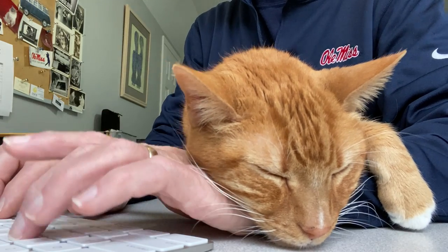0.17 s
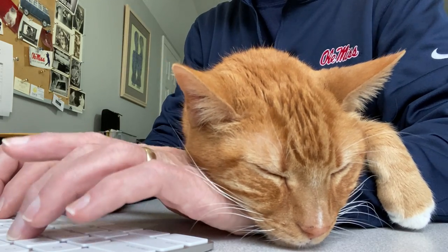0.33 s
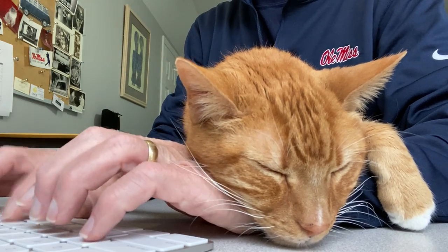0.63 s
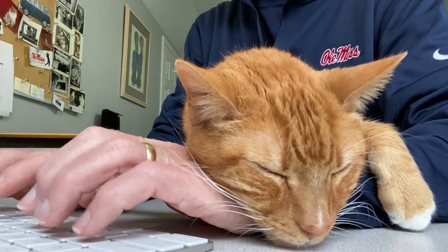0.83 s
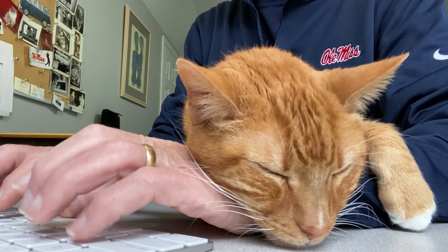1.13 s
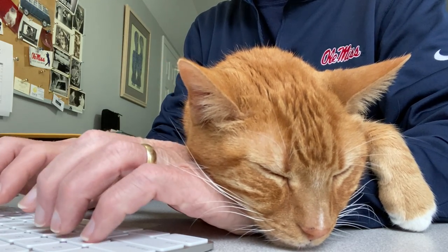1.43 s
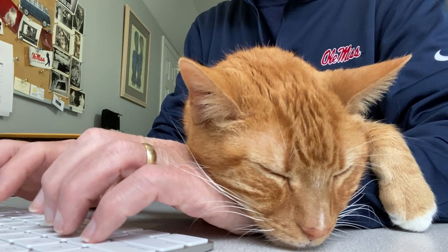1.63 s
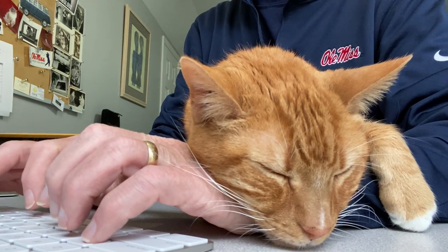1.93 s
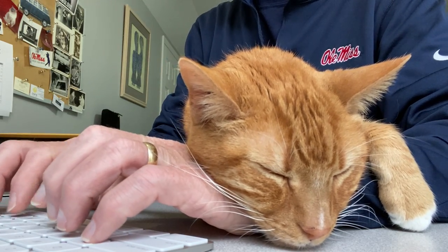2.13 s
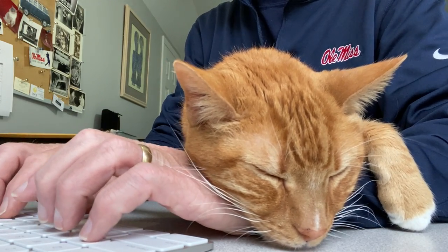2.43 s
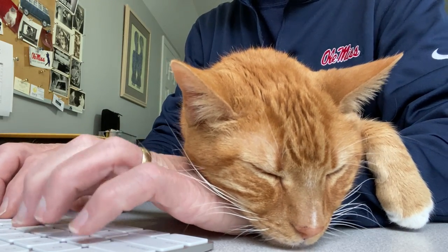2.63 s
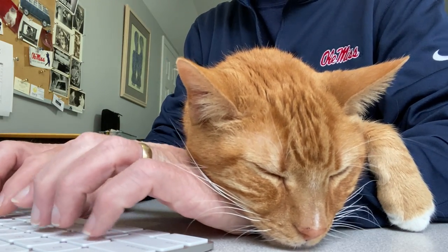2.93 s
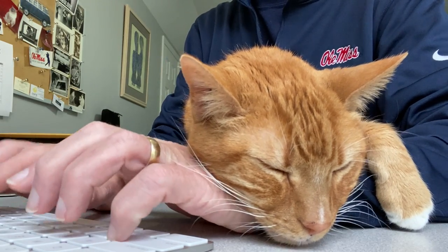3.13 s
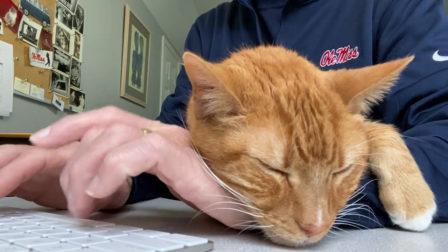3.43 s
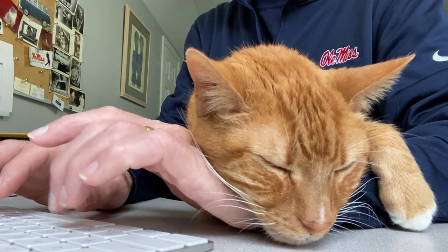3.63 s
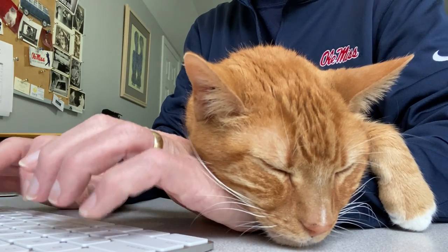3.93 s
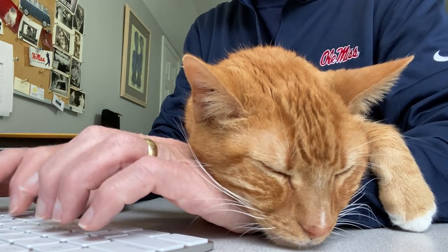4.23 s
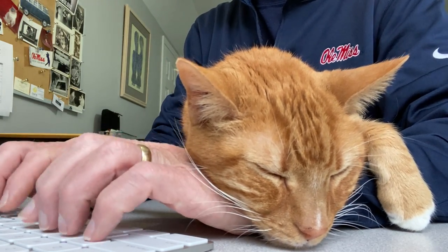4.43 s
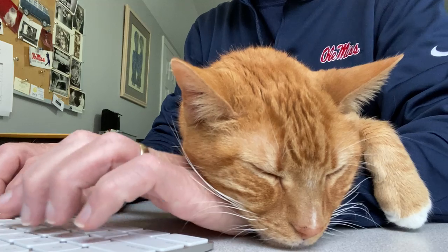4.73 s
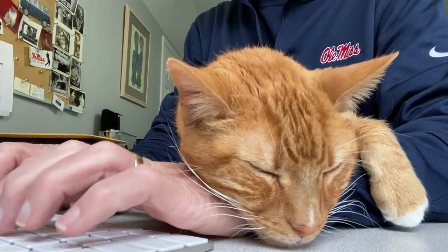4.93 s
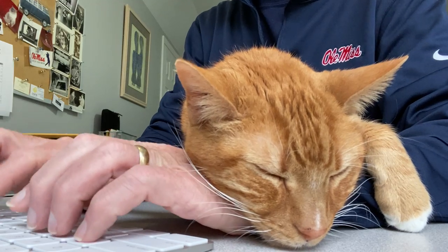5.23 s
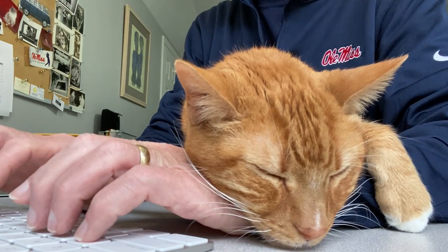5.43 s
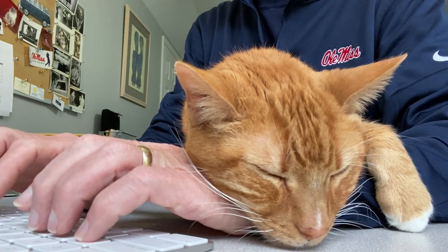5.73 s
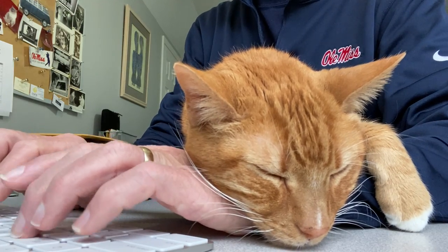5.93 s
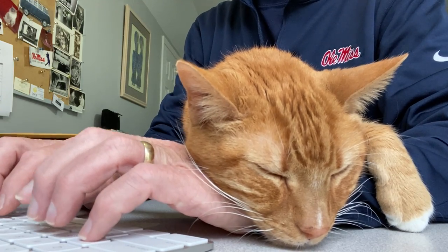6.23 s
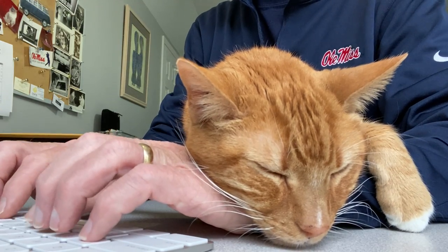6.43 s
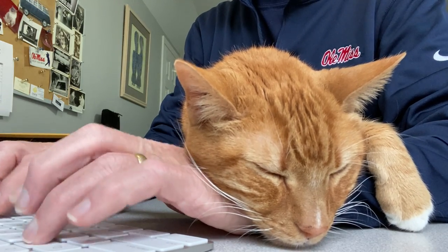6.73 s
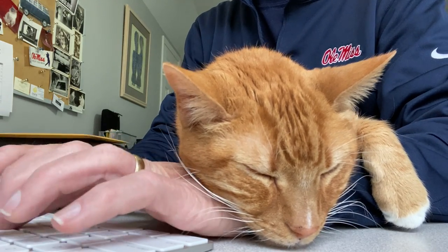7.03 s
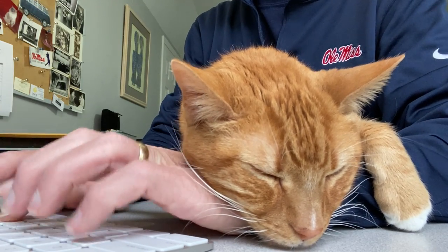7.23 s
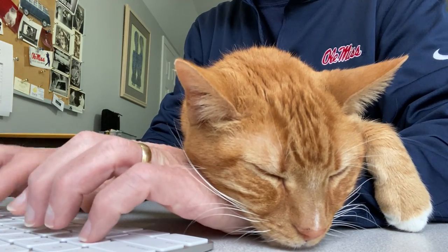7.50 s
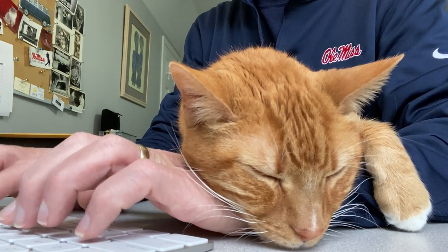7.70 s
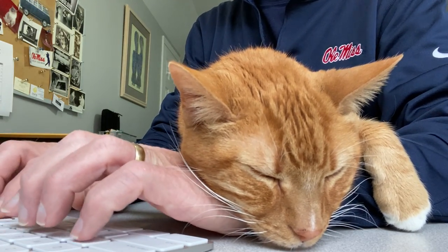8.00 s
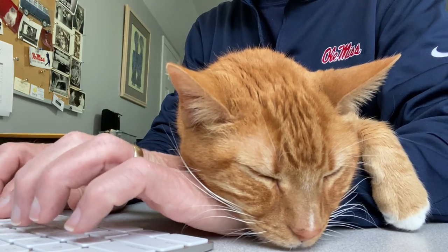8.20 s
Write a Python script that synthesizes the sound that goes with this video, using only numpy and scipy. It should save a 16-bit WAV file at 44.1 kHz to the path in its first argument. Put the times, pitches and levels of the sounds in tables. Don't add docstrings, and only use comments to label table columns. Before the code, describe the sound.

A cat purrs close by in a quiet office, rattling and breathy, while fingers type in irregular bursts on a flat keyboard with soft desk thumps.

```python
import sys
import numpy as np
from scipy import signal
from scipy.fft import next_fast_len
from scipy.io import wavfile
from scipy.ndimage import uniform_filter1d

SR = 44100
rng = np.random.default_rng(int(sys.argv[2]) if len(sys.argv) > 2 else 0)


def store_wav(level_fs):
    pcm = np.round(np.clip(np.atleast_2d(level_fs), -1, 1) * 32767)
    wavfile.write(sys.argv[1], SR, pcm.T.astype(np.int16))


def gain_from_db(level_db):
    decades = np.asarray(level_db, float) / 20
    return 10 ** decades


N = 368676
TIME = np.arange(N) / SR


def level(x, db):
    return x * gain_from_db(db) / np.sqrt(np.mean(x ** 2))


def band(x, hz, width):
    section = np.hstack(signal.iirpeak(hz, hz / (1.793 * width), SR))
    return signal.sosfilt([section, section], x)


def body(x, modes):
    share = np.sqrt(sum(gain_from_db(db) ** 2 * width for _, width, db in modes) * 2.67 / SR)
    ringing = sum((-1) ** k * gain_from_db(db) * band(x, hz, width) for k, (hz, width, db) in enumerate(modes))
    return ringing / share


def walk(rate):
    hold = int(SR / rate)
    steps = np.repeat(rng.standard_normal(N // hold + 1), hold)
    return 3.2 * uniform_filter1d(uniform_filter1d(steps, hold), hold)[:N]


def pair(alike):
    same, left, right = rng.standard_normal((3, N))
    alike = np.clip(alike, 0, 1)
    return np.sqrt(alike) * same + np.sqrt(1 - alike) * np.array([left, right])


def impulses(s, sizes):
    train = np.zeros(N)
    np.add.at(train, np.clip((s * SR).astype(int), 0, N - 1), sizes)
    return train


def clicks(s, db):
    return impulses(s, gain_from_db(db))


def strikes(s, db, fades, lead=None, hold=0):
    t = TIME[:SR // 2]
    fading = np.clip(t - hold, 0, None)
    shape = sum(gain_from_db(fade_db) ** 2 * np.exp(-2 * np.log(1000) * fading / t60) for fade_db, t60 in fades)
    early = gain_from_db(lead[0]) ** 2 * np.exp(-t[1000:0:-1] / lead[1] * 2) if lead else t[:0]
    power = signal.oaconvolve(impulses(s, gain_from_db(db) ** 2), np.r_[early, shape])
    return np.sqrt(np.abs(power[len(early):][:N]))


def place(x, pan_db, lag):
    return np.array([np.roll(x[0], int(lag)) * gain_from_db(pan_db / 2), x[1] * gain_from_db(-pan_db / 2)])


# pitch_hz, level_db, wobble_db
HUM_LINES = [(59, -60.5, 1.5), (98.95, -54, 0.9)]
# pitch_hz, width_hz, level_db
FAN_WHINE = (1080, 80, -79)
# pitch_hz, width_hz, level_db
BUILDING = [(57.7, 9, 0.5), (113.7, 15, -4.5), (29, 5, -8), (150, 22, -16.5)]
# pitch_hz, level_db (per Hz)
ROOM_AIR = [(140, -2), (404, -15), (539, -24), (1080, -10), (1390, -23.5), (10100, -30), (11500, -28),
            (14000, -36)]


def office():
    air_hz, air_db = np.transpose(ROOM_AIR)
    air = 0
    for centre in 150 * 2 ** np.arange(0, 6.6, .5):
        band_db = np.interp(np.log(centre), np.log(air_hz), air_db) + 1.3 * walk(9)
        air = air + gain_from_db(band_db) * band(pair(0.026), centre, centre / 4)
    hum = 0
    for hz, db, wobble_db in HUM_LINES:
        loudness = gain_from_db(db + 5.0 + wobble_db * walk(2.153))
        hum = hum + loudness * np.sin(2 * np.pi * hz * TIME + 0.23 * walk(2.525))
    rumble = level(body(pair(0.75), BUILDING) * gain_from_db(1.2 * walk(5)), -59)
    hz, width, db = FAN_WHINE
    whine = level(band(pair(0.069), hz, width) * gain_from_db(walk(5)), db)
    return level(air, -70) + whine + (hum + rumble) * gain_from_db(np.array([[1.5], [-1.5]]))


CUFFS = (5.05, 8.1)


def sleeve():
    cloth = pair(0.22)

    def swell(middle_s, length_s):
        return np.exp(-((TIME - middle_s) / length_s) ** 2)

    wide = body(cloth, [(1770, 2100, 0)]) * gain_from_db(-66.0) * swell(CUFFS[0], 0.095)
    dull = body(cloth, [(590, 140, 0)]) * gain_from_db(-68.5) * swell(CUFFS[1], 0.037)
    return wide + dull


def desk(s, db, hz, push, t60, pan_db):
    scatter, skew_rad = 0.015, 0.42
    out = np.zeros((2, N + SR))
    t = TIME[:SR // 2]
    swing = np.sin(np.pi * np.clip(t / push, 0, 1)) ** 2
    swing = swing + 0.79 * (1 - np.exp(-3 * t / push)) * gain_from_db(-60 * t / t60)
    ports = np.array([[1], [-1]])
    for s, db, hz, chance in zip(s, db, hz, rng.standard_normal((len(s), 3))):
        at = int((s - 0.11 * push) * SR)
        wave = np.sin(2 * np.pi * hz * (1 + scatter * chance[2]) * t + skew_rad * chance[0] * ports)
        lean_db = pan_db + 2.7 * chance[1]
        out[:, at:at + len(t)] += gain_from_db(db + lean_db / 2 * ports) * swing * wave
    return out[:, :N]


# start_s, level_db, pitch_hz
DESK_THUMPS = [(0.17, -37.5, 64.4), (0.322, -46, 90), (0.482, -39, 64.8), (0.672, -34, 69.2),
               (1.097, -34, 68.3), (1.358, -38, 80.4), (1.463, -41.5, 70.6), (1.564, -35, 70.8),
               (1.644, -43.5, 60.6), (1.773, -28, 71.5), (2.621, -35, 68.8), (3.205, -32.5, 67.3),
               (3.345, -48, 83), (3.494, -40, 66), (3.765, -38, 83.3), (4.027, -28, 68.6),
               (4.261, -35, 70.8), (4.86, -47, 72.7), (5.102, -39, 68), (5.303, -42, 70.2),
               (5.442, -44, 72.2), (5.57, -44, 65), (6.385, -40, 77), (6.875, -38, 67.6),
               (7.151, -33, 67.2), (7.447, -39, 75.7), (7.618, -40, 69.6), (7.689, -44, 61.7),
               (5.999, -48.5, 66.6), (0.591, -48, 68), (0.81, -40.5, 68), (0.95, -44.5, 69.5),
               (6.719, -47, 68.3), (8.32, -45, 67.5)]


def thumps():
    return desk(*np.transpose(DESK_THUMPS), push=0.047, t60=0.54, pan_db=4.4)


# start_s, level_db, upper_mode_db, lower_mode_db (modes relative to level)
DESK_KNOCKS = [(0.157, -35, -8, -2), (0.318, -43, -8, 6), (0.48, -27, -6, -12.5), (0.585, -35, -9, -11),
               (0.675, -38, -8, -14), (0.789, -47, -3.5, -10), (0.943, -34, -11, -1.5),
               (3.612, -46, -9.5, -0.5), (4.94, -54, 1.5, 1), (1.094, -24.5, -5.5, -20),
               (1.189, -38.5, 2, -5), (1.57, -37, -8.5, -2), (1.777, -25, -10.5, -7),
               (2.611, -36, -6.5, -4.5), (2.82, -37, 1.5, -4), (2.958, -29.5, -11, -20),
               (3.055, -33.5, -11, -13), (3.195, -44.5, -5.5, -2), (3.342, -36, 1.5, -12),
               (3.441, -37.5, -2, -5), (3.764, -26.5, -9.5, -1.5), (3.891, -37.5, -7.5, -3.5),
               (4.021, -23, -11, -11), (4.261, -20, -9.5, -20), (4.369, -30, -8.5, -12),
               (6.395, -37.5, -7, -7.5), (6.521, -35, -6, -10), (6.702, -46.5, -8, 9.5),
               (6.832, -43, -9.5, -1.5), (7.03, -49, -16, 5), (7.304, -35.5, 2, -5),
               (7.396, -29, -10.5, -13.5), (5.094, -43.5, -7.5, -11), (8.314, -36.5, -7.5, -9),
               (0.265, -40, -11, -11), (4.635, -43, -10, -7), (7.605, -42.5, -4.5, -5),
               (7.76, -45.5, -8.5, -10)]
# pitch_hz, level_db, t60_s
DESK_PANEL = [(294, -17, 0.079), (400, -24, 0.19), (570, -34, 0.24)]


def knocks():
    s, db, upper_db, lower_db = np.transpose(DESK_KNOCKS)
    out = desk(s, db + upper_db, 192 + 0 * s, 0.038, 0.28, 1.5)
    out = out + desk(s, db + lower_db, 122 + 0 * s, 0.036, 0.03, 1.2)
    for hz, mode_db, t60 in DESK_PANEL:
        out = out + desk(s - .004, db + mode_db, hz + 0 * s, 0.0093, t60, 0)
    return out


# start_s, peak_db, pitch_hz
CASE_RINGS = [(0.155, -39, 1596), (0.155, -42, 2030), (0.17, -50, 1680), (0.316, -49.5, 2040),
              (0.326, -57, 1750), (1.086, -42, 400), (1.088, -50, 570), (1.176, -51.5, 543),
              (3.192, -55, 2150), (7.141, -43, 2950), (0.473, -47, 586), (0.471, -48, 1570),
              (0.657, -39, 1437), (0.658, -39, 2093), (1.086, -45, 1594), (1.086, -48, 880),
              (1.765, -46, 910), (1.765, -44.5, 1395), (2.605, -47, 1450.0), (2.607, -57, 770),
              (2.817, -41.5, 880), (3.191, -41.5, 1480), (3.193, -48, 630), (3.334, -53, 880),
              (3.761, -42.5, 1265), (3.764, -52.5, 880.0), (4.254, -47, 620), (4.254, -46, 880.0),
              (7.142, -44, 1300), (7.143, -39.5, 2100.0), (7.295, -47, 880.0), (7.341, -38.5, 327),
              (3.761, -51.5, 600), (3.764, -57.5, 307), (1.631, -42, 318), (1.766, -37, 292),
              (4.253, -56.5, 427), (0.474, -49.5, 400)]


def rings():
    out = np.zeros(N + SR)
    t = TIME[:SR // 4]
    fade = (1 - np.exp(-t / 0.0013)) * (gain_from_db(-60 * t / 0.023) + 0.064 * gain_from_db(-60 * t / 0.23))
    for s, db, hz in CASE_RINGS:
        at = int(s * SR)
        out[at:at + len(t)] += gain_from_db(db + 7.5) * fade * np.sin(2 * np.pi * hz * t)
    return place(np.array([out[:N], out[:N]]), .4, 3.3)


# start_s, tick_db, cap_db, case_db (cap and case relative to tick)
KEY_TAPS = [(0.1498, -31, -2, -10), (0.155, -42, 3, -8), (0.3085, -39, -1, -15), (0.3158, -51.5, 5, 3),
            (0.472, -24.5, -12.5, -18), (0.6544, -31.5, -13, -13), (0.6582, -37.5, -3, -1),
            (7.1382, -31, -18, -8), (7.1428, -36, -2, 1), (0.9323, -39, -3.5, -13.5),
            (1.084, -22.5, -11, -15.5), (1.3577, -53, -3.5, 7), (3.1891, -41.5, -2.5, 2),
            (5.0817, -35, -7.5, -12), (5.2954, -47, 0, -6), (5.413, -51.5, -4, 7.5),
            (5.909, -34.5, 2, -7.5), (6.5092, -49, -1.5, -4.5)]
# start_s, tick_db, cap_db, case_db, second_ms (negative = before)
KEY_DOUBLES = [(0.7863, -40, -4, -9, 3.5), (1.5523, -47, 0, 6.5, -8.5), (1.7628, -28, -10, -8.5, -3.5),
               (2.6066, -31, -10, -2, -4.5), (2.817, -31, -9, -8, -7.5), (3.332, -26, -18, -17, 2),
               (3.4758, -30, -10, -14.5, 2.5), (3.761, -26, -5, -10, -0.5), (4.0085, -32, -10.5, -8.5, 7.5),
               (4.253, -23.5, -10, -14, -3.5), (4.8498, -46, -3, -9.5, -17), (6.381, -40.5, -7, -9, -8.5),
               (6.702, -41, -10, -12.5, -2.5), (6.853, -40, -9.5, -12, 1.5),
               (7.2942, -30, -6.5, -10.5, 3.5), (8.3053, -41.5, -18, -2, -7.5)]
# start_s, tick_db, case_db, second_ms
KEY_RELEASES = [(0.239, -44, -5.5, -9), (0.408, -44.5, -11, 8.5), (0.5552, -44.5, -11, -6),
                (0.727, -47, 1, -1), (1.0234, -51.5, -24, 7), (1.175, -41.5, -7, -11),
                (1.4431, -46, -1.5, -5), (1.845, -46, -11, 4.5), (2.6914, -44.5, -6, -21),
                (2.9427, -43.5, -6.5, 13), (3.425, -45.5, -13, 2), (3.6021, -41, -13, 6),
                (3.885, -49.5, -10, 8.5), (4.0953, -51.5, -7, 1.5), (4.358, -41, -12, -4),
                (4.933, -49.5, -13, -3), (5.181, -49.5, -17, 1), (6.0465, -42.5, -19, -7),
                (7.0027, -38, -25, -0.5), (7.275, -47.5, -14, -3), (7.397, -47, -4.5, -6),
                (7.5476, -40.5, -12.5, 5.5)]
# start_s, tick_db
CAP_TOUCHES = [(0.44, -57), (5.939, -47), (0.2765, -52), (0.5726, -47.5), (1.1828, -43), (1.3266, -49),
               (2.998, -48), (3.0748, -43.5), (3.0955, -39.5), (4.022, -38), (4.2558, -31.5), (4.428, -46),
               (4.494, -53), (6.1346, -47.5), (6.181, -44.5), (6.8132, -55), (6.8212, -46), (6.942, -56),
               (7.429, -50), (7.657, -51), (1.318, -61.5), (7.946, -50), (7.992, -65.5),
               (0.4761, -32), (0.891, -58), (1.0895, -31), (1.352, -55), (1.5695, -53), (1.642, -54.5),
               (3.012, -47), (3.757, -39), (4.431, -52), (5.137, -52.5), (5.316, -51), (5.9018, -46),
               (6.5176, -51), (6.6907, -56), (6.8442, -50), (6.859, -47), (6.998, -52), (7.379, -51),
               (0.7933, -47), (0.939, -46), (3.336, -40.5)]


def contacts():
    light_cap_db, brush_case_db = -6, -14.5
    rows = [(*tap, 0) for tap in KEY_TAPS] + KEY_DOUBLES
    rows = rows + [(s, db, light_cap_db, *rest) for s, db, *rest in KEY_RELEASES]
    rows = rows + [(s, db, light_cap_db, brush_case_db, 0) for s, db in CAP_TOUCHES]
    rows = np.array(rows)
    s, tick_db, cap_db, case_db, second_ms = rows[np.abs(rows[:, -1]) > 1].T
    again = np.array([s + second_ms / 1000, tick_db - 3, cap_db - 5, case_db - 9])
    return np.c_[rows[:, :-1].T, again]


# pitch_hz, width_hz, level_db
TICK_MODES = [(7100, 1760, -0.5), (9390, 1640, 3), (10050, 2640, -1)]
# pitch_hz, width_hz, level_db
CAP_MODES = [(4020, 1790, 1.5), (4650, 2070, 4), (6030, 1460, 1.5)]
# pitch_hz, width_hz, level_db
CASE_MODES = [(880, 413, 0.5), (1450, 276, 0), (2100, 330, -5.5), (2650, 540, -5)]
# start_s, level_db
GUIDE_SLIDES = [(0.4648, -48), (1.076, -47.5), (1.177, -57), (1.544, -61), (2.807, -53), (3.3229, -46.5),
                (4.245, -49), (7.2855, -51), (8.297, -57)]
# start_s, peak_db
STIFF_SNAPS = [(0.1506, -33), (1.0843, -29), (2.607, -30.5), (3.7597, -26), (4.8324, -52), (5.0816, -44),
               (5.909, -39), (7.003, -54), (7.2744, -49), (7.295, -36.5), (7.547, -49)]
# pitch_hz, width_hz, level_db
SNAP_MODE = [(11430, 1500, 0)]
# start_s, level_db
HOLLOW_HUMS = [(0.158, -53), (0.318, -61.5), (0.662, -57), (0.729, -72.5), (1.361, -72), (2.61, -55.5),
               (7.146, -59.5), (7.297, -64.5)]
# pitch_hz, width_hz, level_db
HOLLOW_MODES = [(1494, 120, -0.84), (1750, 100, -1), (2063, 110, -2)]


def keys():
    s, tick_db, cap_db, case_db = contacts()
    contact_s, scrape = 0.0018, (-27, .003)
    slide = strikes(*np.transpose(GUIDE_SLIDES), [(0, 0.006)], hold=0.0068) * pair(0.58)

    tick_fades = [(-9.0, 0.002), (-13, 0.034), (-30.5, 0.31)]
    tick = strikes(s, tick_db, tick_fades, scrape, contact_s) * pair(0.75)
    tick = tick + clicks(s + .0008, tick_db + 6) + slide
    cap_fades = [(-1.5, 0.005), (-14, 0.035), (-24, 0.17)]
    cap = strikes(s, tick_db + cap_db, cap_fades, scrape, contact_s) * pair(0.67) + slide
    out = place(body(tick, TICK_MODES), 0.15, 0) * gain_from_db(1.5)
    out = out + place(body(cap, CAP_MODES), 2.4, 3.3) * gain_from_db(9)

    snap_s, snap_db = np.transpose(STIFF_SNAPS)
    snap = strikes(snap_s, snap_db - 5, [(-0.5, 0.0039), (-20, 0.04)], hold=0.00069)
    out = out + body(snap * pair(1.0), SNAP_MODE)

    case_fades = [(-8.0, 0.011), (-12.5, 0.066), (-19.5, 0.31)]
    spots = rng.standard_normal((len(s), len(CASE_MODES))).T
    for (hz, width, db), spot in zip(CASE_MODES, spots):
        blow = strikes(s, tick_db + case_db + 2 * spot, case_fades, (-13, .002), contact_s)
        out = out + gain_from_db(db + 13.0) * place(band(blow * pair(0.2), hz, width), 0.0066, 2.9)
    hollow = strikes(*np.transpose(HOLLOW_HUMS), [(0, 0.26)], (-3, .004))
    return out + body(hollow * pair(0.16), HOLLOW_MODES)


# start_s, peak_db, pitch_hz
SUNG_BEADS = [(2.738, -48, 679), (2.994, -48, 950), (3.03, -52, 1130), (3.065, -45, 970), (3.099, -46, 887),
              (3.136, -45.5, 845), (3.171, -40.5, 682), (3.169, -43, 1106), (3.1, -51, 1116),
              (3.134, -53, 1170), (5.229, -45, 674), (5.263, -44.5, 720), (5.299, -40.5, 743),
              (5.331, -39.5, 785), (5.37, -50, 1057), (5.401, -37, 720)]


def chirps():
    out = np.zeros(N)
    t = TIME[:int(.017 * SR)]
    for s, db, hz in SUNG_BEADS:
        at = int(s * SR)
        out[at:at + len(t)] += gain_from_db(db) * np.hanning(len(t)) * np.sin(2 * np.pi * hz * t * (1 + 1.6 * t))
    return place(np.array([out, out]), -10.5, 13.0)


# first_flap_s, period_ms, outward (1 = breathing out)
BREATH_PACE = [
    (-0.012, 35.2, 0),
    (0.8385, 34.2, 1),
    (2.354, 35.42, 0),
    (3.4865, 33.68, 1),
    (5.1165, 35.88, 0),
    (6.4025, 33.82, 1),
    (8.08, 34.6, 0),
]
# full_s, until_s, first_db, last_db, sinks_to_db (throat levels)
BREATH_VOICE = [
    (0.0, 0.458, -53, -58, -66),
    (1.582, 2.078, -54, -55, -84),
    (2.541, 3.485, -56.5, -49.5, -68.5),
    (4.213, 4.792, -51.5, -52.5, -67.5),
    (5.347, 6.266, -49.5, -61.5, -71),
    (7.135, 7.8, -51.5, -54.5, -86),
    (8.302, 8.402, -58.5, -48, -70),
]


def breathing():
    still_db = -80
    ends = [start for start, _, _ in BREATH_PACE[1:]] + [N / SR]
    flaps, out = [], []
    for (start, ms, outward), end in zip(BREATH_PACE, ends):
        run = np.arange(start, end - ms / 2000, ms / 1000)
        flaps.append(run)
        out.append(np.full(len(run), outward))

    def held(low_db, high_db):
        return 0.34 * (high_db - low_db) * (low_db > still_db)

    corners, before_db = [], still_db
    for (full, until, first_db, last_db, after_db), (_, _, outward) in zip(BREATH_VOICE, BREATH_PACE):
        rise_s, fall_s = (0.32, 0.12) if outward else (0.24, 0.066)
        nose_db, chest_db, grows_db = (-13, -2, -1) if outward else (-8, -2, 1.5)
        early_db, late_db = chest_db - grows_db, chest_db + grows_db
        lingering_db = nose_db + 0.16 * (last_db - after_db)
        corners += [(full - rise_s, before_db, nose_db, early_db + 0.13 * held(before_db, first_db)),
                    (full, first_db, nose_db, early_db),
                    (until, last_db, nose_db, late_db),
                    (until + fall_s, after_db, lingering_db, chest_db + held(after_db, last_db))]
        before_db = after_db
    s, *levels = np.transpose(sorted(corners))
    return np.concatenate(flaps), np.concatenate(out), [np.interp(TIME, s, db) for db in levels]


WEAK_FLAPS = [3.28, 3.315, 3.385, 5.515, 5.625, 6.09, 6.165]
# start_s, peak_db
HARD_SLAPS = [(0.028, -57), (0.132, -55), (0.0935, -51), (0.199, -47.5), (2.532, -79), (2.741, -52.5),
              (2.958, -65), (3.486, -70), (3.523, -57), (0.269, -46), (0.417, -51), (0.446, -47),
              (2.671, -61), (2.852, -56), (2.886, -59), (2.919, -46), (3.243, -63), (3.458, -47),
              (5.545, -51), (5.206, -52.5), (5.437, -52), (5.476, -48.5), (5.65, -48.5), (5.657, -47.5),
              (5.7254, -58), (5.763, -55.5), (5.799, -63), (5.944, -51.5), (6.306, -67), (8.264, -60.5),
              (8.285, -69), (8.318, -56), (5.689, -52), (5.869, -47.5), (6.017, -53), (6.126, -51),
              (6.237, -57), (6.336, -55.5)]
# start_s, peak_db
OUT_SLAPS = [(1.324, -51.5), (1.389, -52), (1.494, -42.5), (1.539, -36.5), (1.566, -41), (1.599, -43),
             (1.63, -36), (1.636, -39), (1.656, -51), (1.708, -42.5), (1.808, -52), (1.842, -53),
             (1.865, -50), (1.905, -42), (1.929, -37.5), (1.977, -45), (1.996, -62), (4.175, -50),
             (4.205, -47), (4.225, -38), (4.242, -44), (4.297, -45), (4.31, -39), (4.336, -44),
             (4.374, -46.5), (4.407, -54), (4.436, -47), (4.473, -45), (4.503, -57), (4.574, -49.5),
             (4.638, -47), (4.674, -46), (4.697, -54.5), (4.709, -52), (7.061, -47.5), (7.088, -44.5),
             (7.113, -54), (7.191, -39.5), (7.219, -56), (7.257, -47), (7.314, -38.5), (7.352, -39),
             (7.393, -37.5), (7.483, -46), (7.526, -40), (7.629, -52), (7.694, -49), (7.763, -50.5),
             (1.221, -51), (1.423, -58), (1.444, -60), (1.664, -52), (1.675, -63), (1.777, -45),
             (4.129, -55), (4.235, -42), (4.362, -56), (4.391, -50), (4.4297, -41), (4.46, -57),
             (4.538, -49), (4.598, -68), (6.577, -53), (6.775, -54), (6.91, -56), (3.86, -53), (3.921, -56),
             (3.965, -60), (7.159, -46.5), (7.323, -42), (7.365, -39), (7.383, -53), (7.495, -48),
             (7.519, -46), (7.752, -53)]
# pitch_hz, width_hz, level_db
THROAT_MODES = [(720, 138, 7), (960, 148, 4.5), (1245, 115, 3)]
# pitch_hz, width_hz, level_db
CHEST_MODES = [(302.3, 38.3, -6), (415.3, 46, -12), (191.6, 107, -4)]
# pitch_hz, width_hz, level_db
NOSE_MODES = [(4400, 530, 2.5), (5740, 760, 3.5), (7420, 530, -6.5), (9240, 1100, -2.5)]


def purr():
    flaps, out, levels_db = breathing()
    effort, nose, chest = (gain_from_db(db) for db in levels_db)
    chance = rng.standard_normal((len(flaps), 6)).T
    main = flaps + .001 + .013 * out + (.001 + .002 * out) * chance[0]
    other = main + .008 - .019 * out + .002 * chance[1]
    weak_db = -15 * (np.abs(main[:, None] - WEAK_FLAPS).min(axis=1) < .015)
    times = np.r_[main, other]
    sizes_db = np.r_[2.5 * chance[2] + weak_db, -6 + 2.5 * chance[3] + weak_db]
    snap = [(0, .009), (-18, .05), (-27, .2)]
    flap_knocks = level(strikes(times, sizes_db, snap), 0)
    shoves = level(strikes(times, sizes_db, [(0, .03), (-18, .12)]), 0)

    cycle = np.clip(np.searchsorted(flaps, TIME) - 1, 0, None)
    since = TIME - flaps[cycle] - .002 * out[cycle]
    stays_open = (.018 - .005 * out + .003 * chance[4])[cycle]
    puff = np.clip(since / 0.00029, .1, 1) * np.clip((stays_open - since) / 0.0013, .1, 1)
    gust = gain_from_db(2.5 * chance[5] + weak_db)[cycle]
    puff = level(puff * gust, 0) + gain_from_db(-3) * flap_knocks

    hard_s, hard_db = np.transpose(HARD_SLAPS + [(s, db - 5) for s, db in OUT_SLAPS])
    flap_knocks = flap_knocks * gain_from_db(-5.5 * out[cycle])
    blows = flap_knocks * effort * gain_from_db(-8.5) + gain_from_db(5.5) * strikes(hard_s, hard_db, snap)
    slaps = clicks(hard_s + 0.001, hard_db)
    throat = body(blows * pair(0.059), THROAT_MODES)
    throat = throat + gain_from_db(16) * body(slaps, THROAT_MODES) + gain_from_db(20) * body(slaps, CHEST_MODES)

    ribs = body(shoves * pair(0.36), CHEST_MODES) * chest * gain_from_db(-0.5)
    ribs = ribs + band(shoves * pair(0.54), 76.4, 43.6) * chest * gain_from_db(26.5)

    slap_s, slap_db = np.transpose(HARD_SLAPS)
    forced = strikes(slap_s, slap_db - 15, [(0, 0.013)], hold=0.013)
    hiss = body((puff * nose * gain_from_db(-9) * effort + forced) * pair(0.97), NOSE_MODES)
    mouth = band(puff * pair(0.67), 2520, 530) * gain_from_db(-9.5) * effort
    return place(throat, -5.5, 12.1) + effort * place(ribs, -0.55, 22.1) + place(hiss + mouth, -2.5, 11)


def scene():
    typing = thumps() + knocks() + rings() + keys()
    return office() + sleeve() + typing + chirps() + purr()


def band_limit(x):
    return signal.sosfilt(signal.butter(12, 16200, fs=SR, output="sos"), x)


def record(dry):
    mid, side = (dry[0] + dry[1]) / 2, (dry[0] - dry[1]) / 2
    high = signal.filtfilt(*signal.butter(4, 11000, "high", fs=SR), mid)
    top = gain_from_db(2.5) * np.imag(signal.hilbert(high, next_fast_len(N))[:N])
    side = side - 0.87 * band(side, 9300, 7630) + top
    wet = np.array([mid + side, mid - side])
    wet = signal.sosfilt(signal.butter(2, 35, "high", fs=SR, output="sos"), wet)
    wet = signal.sosfilt(signal.butter(5, 12700, fs=SR, output="sos"), wet)
    return band_limit(wet)


dry = scene()
out = record(dry)
store_wav(out)
```